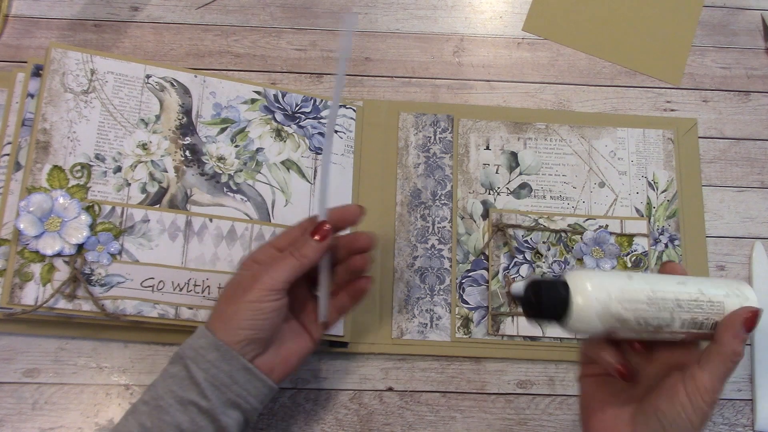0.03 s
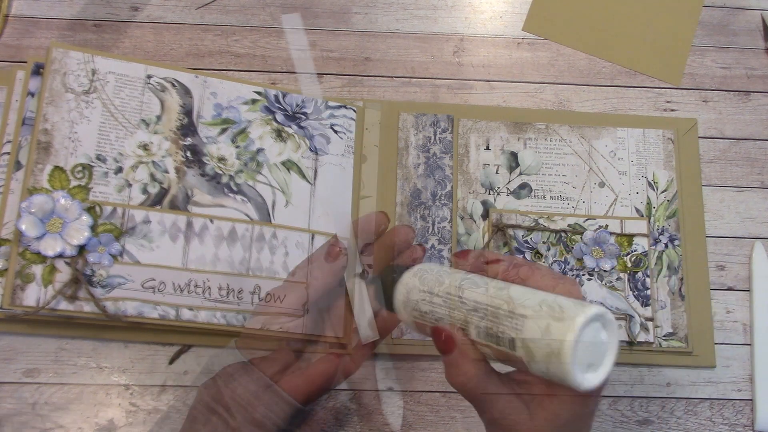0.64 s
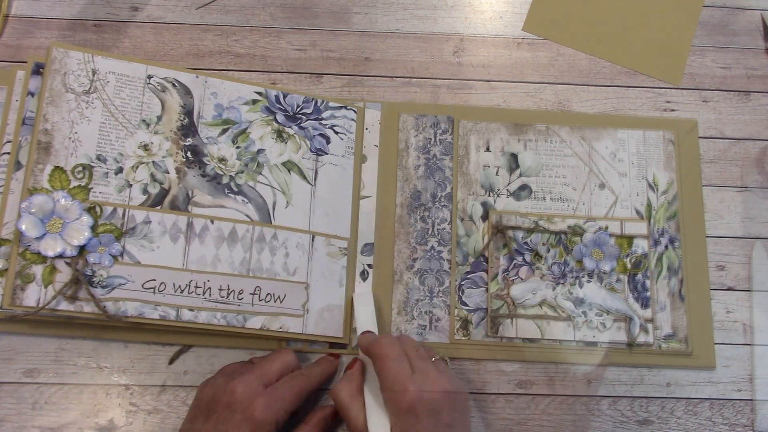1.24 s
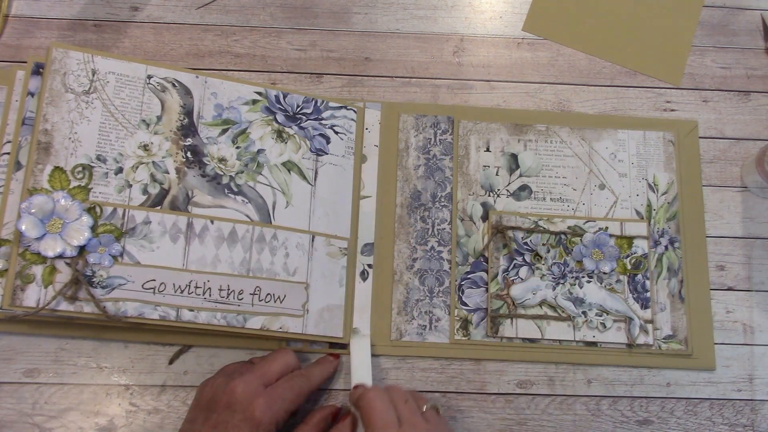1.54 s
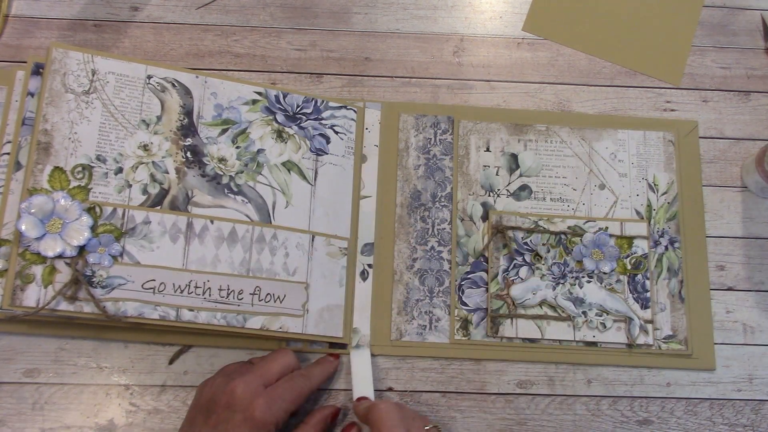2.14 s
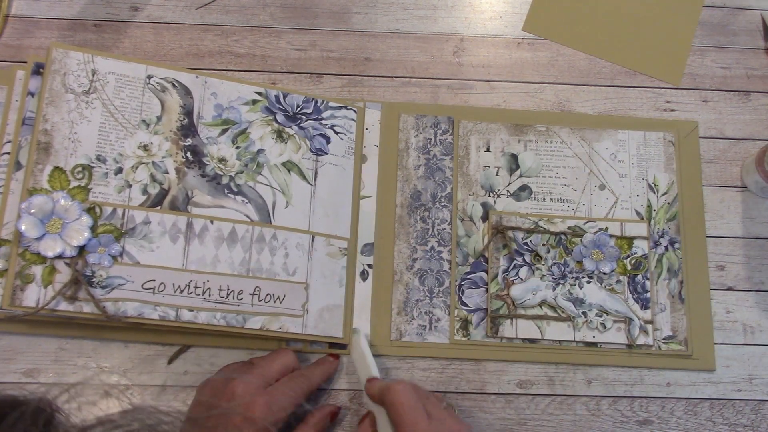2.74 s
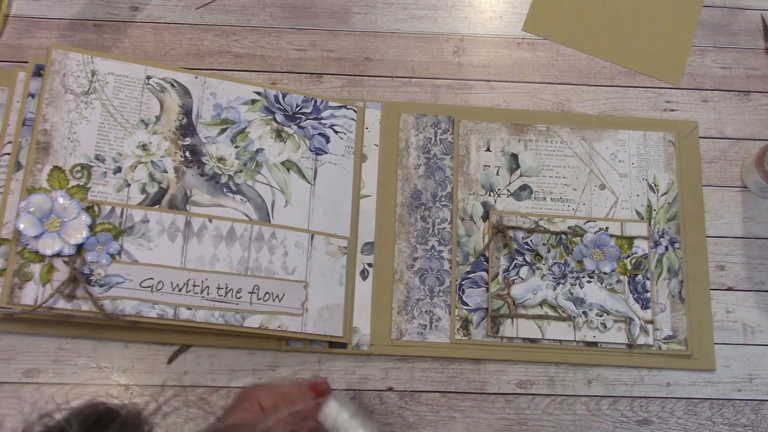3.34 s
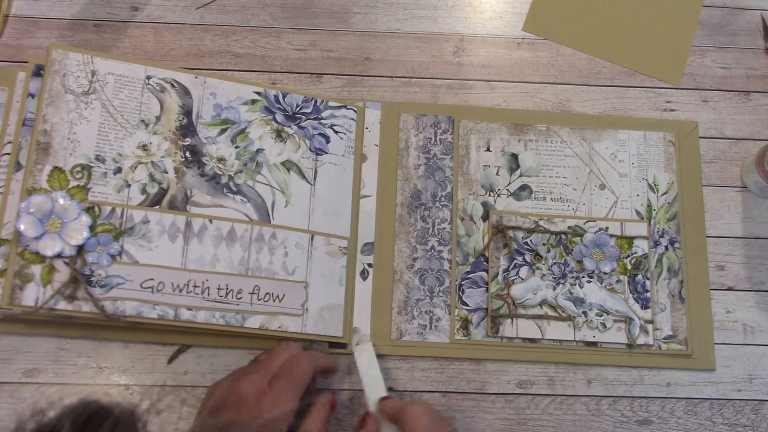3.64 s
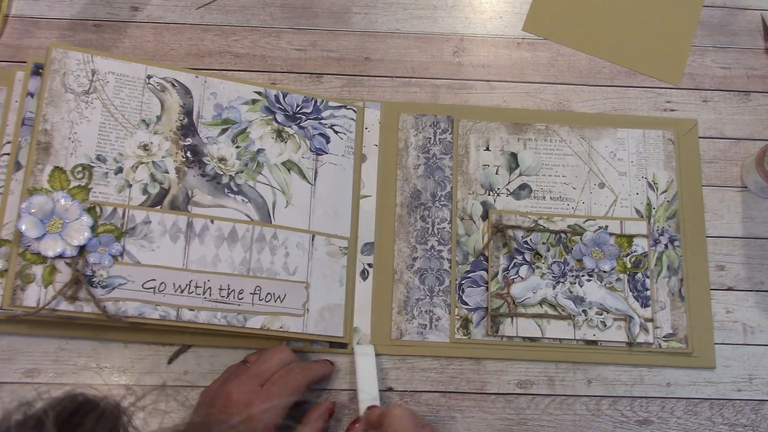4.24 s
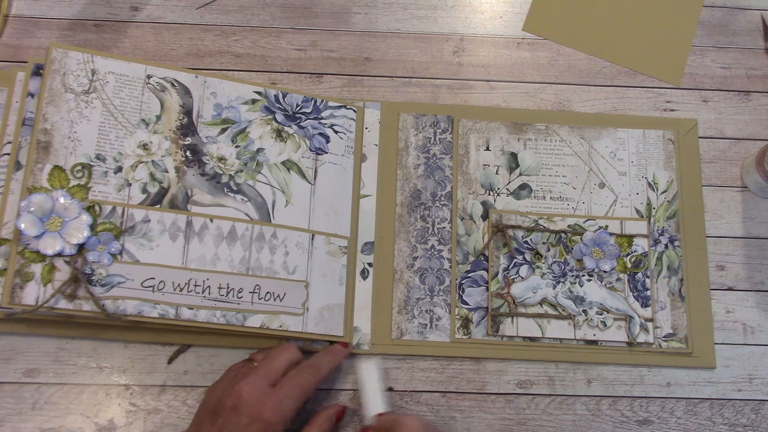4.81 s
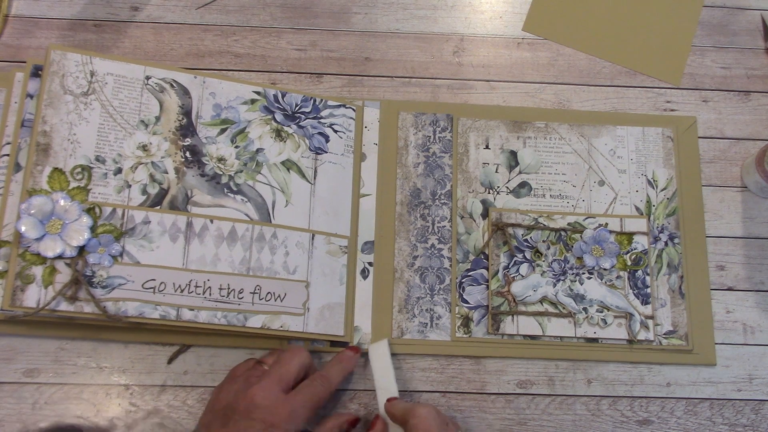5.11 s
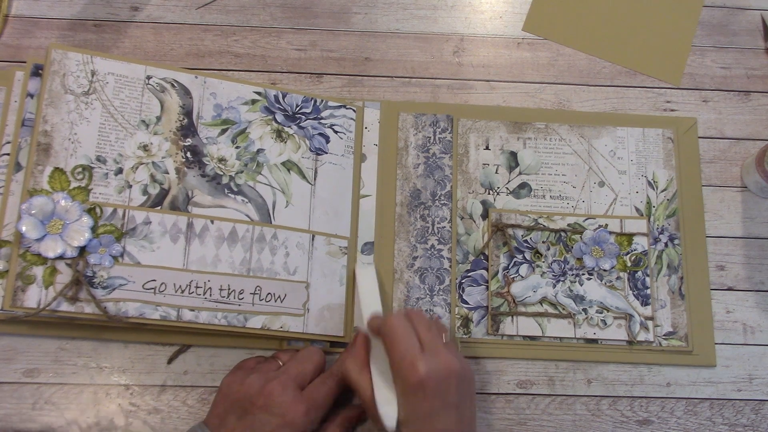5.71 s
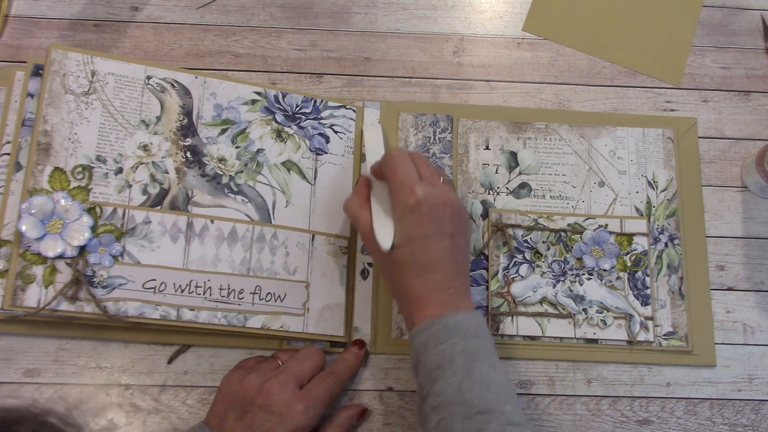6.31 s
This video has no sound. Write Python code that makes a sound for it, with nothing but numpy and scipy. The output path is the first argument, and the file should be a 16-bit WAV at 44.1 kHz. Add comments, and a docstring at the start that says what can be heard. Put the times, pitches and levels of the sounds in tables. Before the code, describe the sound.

Light taps of a plastic tool on card and two hard knocks on a wooden table, with faint rubbing in a small room.

```python
"""Faint rubbing, a squeak and the ticks of a glue bottle turned in the hand open the scene.
A paper strip is being glued into the spine of a card album on a wooden table. A plastic folding tool
taps the card, tip first and then flat, and twice knocks hard on the table; each impact excites damped
modes of card or wood. Fingers and paper rub softly by friction, and the small room answers with
standing waves, an echo and a short reverberation over a steady hush."""
import sys
import numpy as np
from scipy import signal
from scipy.fft import rfft, irfft, next_fast_len
from scipy.io import wavfile
from scipy.ndimage import uniform_filter1d

SR = 44100
rng = np.random.default_rng(int(sys.argv[2]) if len(sys.argv) > 2 else 0)


def wav_record(signal):
    """Record a signal, one row per channel, as 16-bit PCM in the file named by sys.argv[1]."""
    frames = np.transpose(np.atleast_2d(signal))
    bounded = np.clip(frames, -1, 1)
    # unit amplitude maps onto the largest positive 16-bit level
    quanta = np.round(bounded * 32767).astype(np.int16)
    wavfile.write(sys.argv[1], SR, quanta)


N = 289428

# Hard knocks on the table. Each row: start in seconds, level in dB, treble tilt in dB per octave,
# lead of the tool's slip in seconds, level of the slip in dB.
HARD_KNOCKS = [(2.2100, -3.5, -2.5, 0.015, -31.5), (4.8007, -1.5, -1, .0297, -45)]
# Spectrum of a hard contact. Each row: frequency in Hz, relative level in dB.
SNAP_SPECTRUM = [(2000, -22), (4500, -1.5), (7000, 3.5), (9500, -3.5), (12500, -4), (16000, -13)]


def knocks(rise_s=0.0006, crack_db=-12, rattle_db=-1, shiver_db=-6):
    """Impact excitation: the tool cracks on the table, whose strong modes ring while weak ones rattle."""
    # Modes of the tabletop with the tool on it. Each row: frequency in Hz, level in dB, T60 in seconds.
    table_modes = [(106.7, -37.5, 0.16), (191, -29.5, 0.097), (322.7, -36, 0.18), (467, -25, 0.028),
                   (642, -26, 0.085), (905, -38, 0.27), (969, -9, 0.043), (1120, -17.5, 0.038),
                   (1408, -21.5, 0.078), (1737, -11, 0.019), (1870, -28.5, 0.014), (2630, -4.5, 0.011),
                   (3240, -14.5, 0.013), (3705, -24.5, 0.024), (4170, -11.5, 0.0067), (5540, -29.5, 0.017),
                   (6910, -13.5, 0.0041)]
    # Dense weak modes of the album and loose things. Each row: frequency in Hz, relative level in dB.
    rattle_spectrum = [(80, 0), (200, -15), (550, -0.5), (1200, -5.5), (2100, -5), (3300, -11),
                       (4400, -14.5), (5500, -14), (12000, -35), (16000, -47)]
    out = np.zeros(N)
    margin = SR // 100
    for start, db, tilt_db, *_ in HARD_KNOCKS:
        body = ring(table_modes) * (1 - np.exp(-ring_time() / rise_s))
        crack = amp(crack_db) * contact(SNAP_SPECTRUM, scuff_db=11, t60=0.0064)
        shaking = amp(rattle_db) * burst(0.12) + amp(shiver_db) * burst(0.28)
        rattle = signal.fftconvolve(shaking, minimum_phase(rattle_spectrum))[:len(body)]
        blow = np.pad(body + crack + rattle, (margin, 0))
        # A harder blow is a shorter contact, hence brighter.
        blow = filtered(blow, lambda f: amp(tilt_db * np.log2(0.5 + f / 1000)))
        add(out, start - margin / SR, amp(db) * blow)
    return out


def taps(bounces=3, mean_gap_s=0.009, chatter_db=-13.5, loss_db=0.5):
    """Rebound: the tool's tip lands and chatters at uneven gaps; its flat lands with a duller sound."""
    # Light taps on the card. Each row: start in seconds, tip level in dB, relative snap level in dB,
    # delay of the flat in seconds, level of the flat in dB.
    landings = [(1.2606, -40, -13.5, .0068, -46), (2.492, -49.5, -21, .0358, -44.5),
                (2.587, -41, -8.5, .0152, -34.5), (2.8451, -48, -18, .0077, -43),
                (2.8795, -47.5, -21, .041, -47), (3.645, -41, -17, .0232, -33.5),
                (3.7028, -37, -19, .006, -37), (4.931, -45, -15, .0056, -33),
                (5.0904, -42, -18, .0151, -38.5), (5.3121, -41, -19, .013, -40.5),
                (5.415, -28, -15.5, .030, -32)]
    out = np.zeros(N)
    tip_thud_db = -6.5
    gaps = mean_gap_s * rng.uniform(0.5, 1.5, (len(landings), bounces))
    for (start, db, snap_db, delay, flat_db), tap_gaps in zip(landings, gaps):
        add(out, start, amp(db) * card_impact(tip_thud_db, snap_db))
        for k, later in enumerate(np.cumsum(tap_gaps)):
            add(out, start + later, amp(db + chatter_db - k * loss_db) * card_impact(tip_thud_db, snap_db))
        add(out, start + delay, amp(flat_db) * card_impact(thud_db=-12.5, snap_db=-24.5))
    return out


def card_impact(thud_db, snap_db):
    """Modal response: the card, struck at a new spot each time, rings over a table thud and a snap."""
    # Modes of the card cover. Each row: frequency in Hz, level in dB, T60 in seconds.
    card_modes = [(1370, -24, 0.03), (2000, 0.5, 0.0076), (2530, -5, 0.021), (3080, 2, 0.01),
                  (4230, -5.5, 0.0086), (5250, -3, 0.0021)]
    # Response of the table under the card. Each row: frequency in Hz, relative level in dB.
    thud_spectrum = [(40, -49), (80, -19.5), (150, -8), (350, -2.5), (600, -1), (1000, -1), (1600, -8.5),
                     (3000, -41)]
    card = amp(-7) * ring(card_modes, detune=0.053)
    thud = amp(24 + thud_db) * contact(thud_spectrum, scuff_db=9.5, t60=0.041)
    snap = amp(18 + snap_db) * contact(SNAP_SPECTRUM, scuff_db=2, t60=0.012)
    return card + thud + snap


def contact(spectrum, scuff_db, t60):
    """Source and filter: an impulse of force with a short scuff behind it takes on the given spectrum."""
    force = amp(scuff_db) * burst(t60)
    force[0] += 1
    return signal.fftconvolve(force / np.linalg.norm(force), minimum_phase(spectrum))[:len(force)]


def tabletop(x, cutoff_hz=80):
    """Radiation efficiency: the board gives off little sound below its lowest mode."""
    return signal.sosfilt(signal.butter(4, cutoff_hz, 'highpass', fs=SR, output='sos'), x)


def cushioned(x, cutoff_hz=13500):
    """Contact compliance: paper and skin yield, taking the highest treble off light contacts."""
    return filtered(x, lambda f: 1 / np.hypot(1, (f / cutoff_hz) ** 3))


def ticks(gain_db=-1, crackle_db=-7.5):
    """Transient excitation: tiny slips of bottle, nails and paper ring briefly, with a crackle above."""
    # Dry ticks. Each row: start in seconds, level in dB, resonance in Hz, T60 in seconds, quality factor.
    slips = [(0.0986, -40.5, 4100, 0.03, 4.8), (0.3035, -45.5, 2950, 0.011, 1.9),
             (0.4852, -46.5, 2400, 0.023, .8), (.5589, -40, 3350, 0.029, 7),
             (0.879, -44, 4000, 0.058, 0.57), (1.5835, -44, 2470, .008, 1.2),
             (3.692, -30.5, 3480, 0.0035, 1.6), (4.9568, -46, 7000, 0.054, 1.8),
             (5.604, -47.5, 4650, 0.017, 4.3), (6.073, -47, 3260, 0.015, 1.5),
             (6.1775, -26, 9450, .0034, 3.8), (6.2617, -39.5, 10000, 0.0064, 1.5)]
    out = np.zeros(N)
    for start, db, hz, t60, q in slips:
        tone = filtered(burst(t60), lambda f: resonance(f, hz, q) * resonance(f, hz, 1.0))
        crackle = signal.fftconvolve(burst(t60), minimum_phase(SNAP_SPECTRUM))[:len(tone)]
        crackle = filtered(crackle, lambda f: f ** 2 / (f ** 2 + (2 * hz) ** 2))
        tick = tone / np.abs(tone).max() + amp(crackle_db) * crackle / np.abs(crackle).max()
        add(out, start, amp(db + gain_db) * tick)
    return out


def bumps(gain_db=2.5, slip_hz=1050, push_lead_s=0.00293, push_db=-26, push_hz=550):
    """Soft impacts: hands bump the album; before each knock the tool slips and presses the card flat."""
    # Bumps of the hand. Each row: start in seconds, level in dB, frequency in Hz.
    hand_bumps = [(2.547, -46.5, 590), (2.779, -51, 380), (4.38, -51, 388), (5.0662, -45.5, 676),
                  (5.94, -44.5, 910), (6.5443, -40.5, 450)]
    out = np.zeros(N)
    for start, db, hz in hand_bumps:
        add(out, start, amp(db) * bump(hz))
    for start, db, _, lead, slip_db in HARD_KNOCKS:
        add(out, start - lead, amp(slip_db) * bump(slip_hz))
        add(out, start - push_lead_s, amp(db + push_db) * bump(push_hz))
    return amp(gain_db) * out


def bump(hz, t60=0.018, rise_s=0.00023):
    """Heavy damping: a soft contact sounds one dull note that swells and dies at once."""
    return ring([(hz, 0, t60)]) * (1 - np.exp(-ring_time() / rise_s))


def fidgets(count=18, strongest_db=-55, range_db=14):
    """Random excitation: fingertips and nails touch the card faintly at scattered moments."""
    out = np.zeros(N)
    for when, strength in rng.uniform(size=(count, 2)):
        db = strongest_db - range_db * (1 - strength)
        add(out, when * N / SR, amp(db) * card_impact(thud_db=-8, snap_db=-24))
    return out


def rubs(grain_db=3, q=0.43):
    """Friction noise: paper fibres catch and slip under each soft stroke."""
    # Strokes of paper and skin. Each row: middle in seconds, half width in seconds, level in dB,
    # resonance in Hz.
    strokes = [(0.026, 0.12, -59.5, 1250), (0.038, 0.02, -61, 6500), (0.151, 0.012, -57, 5950),
               (0.214, 0.021, -63, 5470), (0.46, 0.056, -68.5, 4500), (0.705, 0.27, -69.5, 1330),
               (3.056, 0.027, -65.5, 5860), (3.497, 0.021, -62.5, 10500), (3.87, 0.13, -67.5, 1640),
               (5.14, 0.33, -69.5, 4640), (5.98, 0.31, -70.5, 6300), (6.024, 0.1, -66.5, 875)]
    out = np.zeros(N)
    for middle, half_width, db, hz in strokes:
        fibres = rng.standard_normal(N) * amp(grain_db * wander(60))
        slide = unit(filtered(fibres, lambda f: resonance(f, hz, q) / np.hypot(1, (f / hz / 2) ** 2)))
        out += amp(db) * slide * swell(middle, half_width)
    return out


def squeak(db=-62, hz=1900, q=18):
    """Narrow-band friction: fingers squeak faintly as they turn the glue bottle."""
    slip = unit(filtered(rng.standard_normal(N), lambda f: resonance(f, hz, q) ** 2))
    return amp(db) * slip * swell(middle_s=0.012, half_width_s=0.03)


def room(x, wall_s=0.023, wall_db=-5, standing_db=-2, build_s=0.0012, tail_db=-1, side_db=-16):
    """Reflection: standing waves, one wall echo and a diffuse tail join the direct sound, in stereo."""
    # Standing waves between desk and walls. Each row: frequency in Hz, relative gain in dB, T60 in seconds.
    room_modes = [(123, -3, .35), (162, -6, .3), (188, -3.5, .28), (327, -1, .2), (493, -3, .25),
                  (523, -5, .15), (638, -3, .2), (829, -3, .18), (935, -7, .15), (1491, -3, .25),
                  (1526, 0, .17), (1664, 1.5, .2), (1733, 2, .21), (1896, -1, .17)]
    t = ring_time()
    waves = sum(amp(db) * 2 * fade(t60) / fade(t60).sum() * np.cos(2 * np.pi * hz * t)
                for hz, db, t60 in room_modes)
    waves = amp(standing_db) * waves * (1 - np.exp(-t / build_s))
    mid = x + signal.fftconvolve(x, waves + amp(tail_db) * diffuse_tail())[:N]
    add(mid, wall_s, amp(wall_db) * filtered(x, lambda f: resonance(f, hz=1710, q=8.5)))
    side = amp(side_db) * signal.fftconvolve(x, diffuse_tail())[:N]
    return np.array([mid + side, mid - side])


def diffuse_tail(build_s=0.0013):
    """Reverberation: scattered reflections build up, and each frequency decays at its own rate."""
    # Reverberation time of the room. Each row: frequency in Hz, T60 in seconds.
    decay_times = [(100, 0.41), (500, 0.25), (1600, 0.25), (2700, 0.2), (4000, 0.21), (12000, 0.14)]
    # Colour of the reverberation. Each row: frequency in Hz, gain in dB.
    colour = [(60, -7), (150, -13), (500, -1.5), (1000, -14), (1700, -4), (2700, -7.5), (3400, -5.5),
              (4300, -5.5), (6000, -9), (9000, -9), (15000, -6)]
    hz, t, bands = signal.stft(rng.standard_normal(SR // 2), SR, nperseg=256)
    decay = np.exp(-np.log(1000) * t / along(decay_times, hz)[:, None])
    tail = signal.istft(bands * decay, SR)[1][:SR // 2]
    tail *= (1 - np.exp(-ring_time() / build_s)) ** 2
    return filtered(tail / np.linalg.norm(tail), lambda f: amp(along(colour, f)))


def hush(level_db=-60.5):
    """Partial coherence: the steady noise of the room air is partly alike at left and right."""
    # Spectrum of the air noise. Each row: frequency in Hz, relative spectral density in dB.
    air_spectrum = [(12, -67), (20, -20), (60, -15.5), (172, -3.5), (410, -4), (446, -4.5), (1370, -12.5),
                    (1480, -11), (1610, -15), (2320, -15.5), (3530, -20), (5680, -23.5), (6360, -23.5),
                    (14300, -35), (16000, -44)]
    # Likeness of left and right. Each row: frequency in Hz, correlation coefficient.
    coherence = [(25, 0.6), (70, 0.63), (200, 0.61), (1000, 0.63), (5000, 0.72), (14000, 0.93)]

    def mid_side_gains(f):
        angle = np.arccos(np.clip(along(coherence, f), -1, 1)) / 2
        return amp(along(air_spectrum, f)) * [np.cos(angle), np.sin(angle)]

    mid, side = filtered(rng.standard_normal((2, N)), mid_side_gains)
    return amp(level_db) * unit(np.array([mid + side, mid - side]))


def whines(waver_hz=9):
    """Frequency modulation: faint appliance tones waver at random in pitch."""
    # Appliance tones. Each row: frequency in Hz, level in dB.
    tones = [(194, -105), (2239, -92), (3779, -90.5), (5561, -85.5)]
    out = np.zeros(N)
    for hz, db in tones:
        phase = 2 * np.pi * np.cumsum(hz + waver_hz * wander(900)) / SR
        out += amp(db) * unit(np.sin(phase))
    return out


def ring(modes, detune=0):
    """Superposition of damped modes; neighbours swing in opposite directions."""
    t = ring_time()
    out = np.zeros(len(t))
    for k, (hz, db, t60) in enumerate(modes):
        detuned_hz = hz * (1 + detune * rng.normal())
        out += (-1) ** k * amp(db) * fade(t60) * np.sin(2 * np.pi * detuned_hz * t)
    return out


def burst(t60):
    """Exponentially decaying noise of unit energy."""
    x = rng.standard_normal(SR // 2) * fade(t60)
    return x / np.linalg.norm(x)


def fade(t60):
    """Exponential decay by 60 dB in t60 seconds."""
    return np.exp(-np.log(1000) * ring_time() / max(t60, 1e-4))


def ring_time():
    """Seconds since a blow."""
    return np.arange(SR // 2) / SR


def swell(middle_s, half_width_s):
    """Gaussian envelope of a stroke."""
    return np.exp(-((np.arange(N) / SR - middle_s) / half_width_s) ** 2 / 2)


def wander(samples):
    """Random fluctuation of rms 1: noise under a moving average."""
    return unit(uniform_filter1d(rng.standard_normal(N), size=samples))


def resonance(f, hz, q):
    """Band-pass response of a damped oscillator."""
    return 1j * f * hz / q / (hz * hz - f * f + 1j * f * hz / q)


def minimum_phase(spectrum):
    """The most compact causal impulse response with this spectrum, at unit energy."""
    size = SR // 10
    cepstrum = irfft(np.log(amp(along(spectrum, np.fft.rfftfreq(size, 1 / SR)))))
    lag = np.arange(size)
    causal_fold = (lag < size // 2) * np.minimum(lag + 1, 2)
    pulse = irfft(np.exp(rfft(cepstrum * causal_fold)))
    return pulse / np.linalg.norm(pulse)


def filtered(x, response):
    """Linear filtering: the spectrum of x times a frequency response."""
    n = x.shape[-1]
    padded = next_fast_len(n + SR // 4)
    return irfft(rfft(x, padded) * response(np.fft.rfftfreq(padded, 1 / SR)), padded)[..., :n]


def along(points, hz):
    """Interpolation of (Hz, value) points on a logarithmic frequency axis."""
    f, values = np.transpose(points)
    return np.interp(np.log(hz + 1), np.log(f + 1), values)


def amp(db):
    """Decibels to gain."""
    return 10 ** (np.asarray(db) / 20)


def unit(x):
    """x at rms 1."""
    return x / np.sqrt(np.mean(x ** 2) + 1e-20)


def add(track, start_s, x):
    """Mix x into track from start_s on."""
    i = max(round(start_s * SR), 0)
    track[i:i + len(x)] += x[:max(N - i, 0)]


def scene():
    """Superposition: close blows and handling sound in the room, over its hush and faint tones."""
    blows = tabletop(knocks() + cushioned(taps() + bumps() + fidgets()))
    handling = cushioned(ticks() + rubs()) + squeak()
    balance = amp([[-0.15], [0.15]])
    return room(blows + handling) * balance + hush() + whines()


def record(dry, bass_hz=20, top_hz=16000):
    """Band limiting: the deepest bass rolls off and nothing passes above the upper limit."""
    return filtered(dry, lambda f: (f < top_hz) * f / np.hypot(f, bass_hz))


dry = scene()
out = record(dry)
wav_record(out)
```